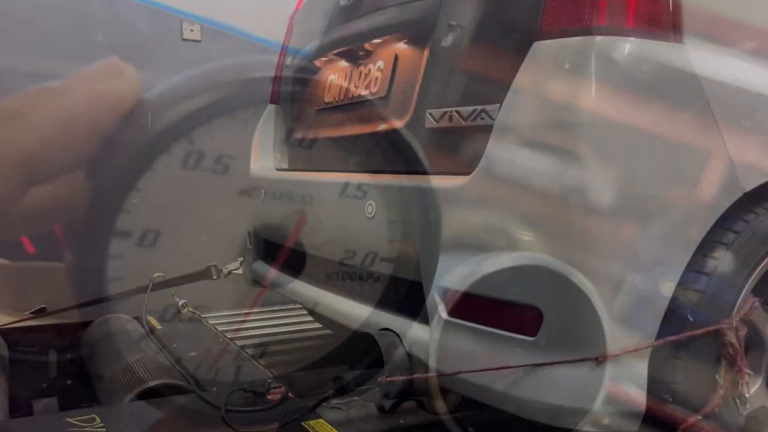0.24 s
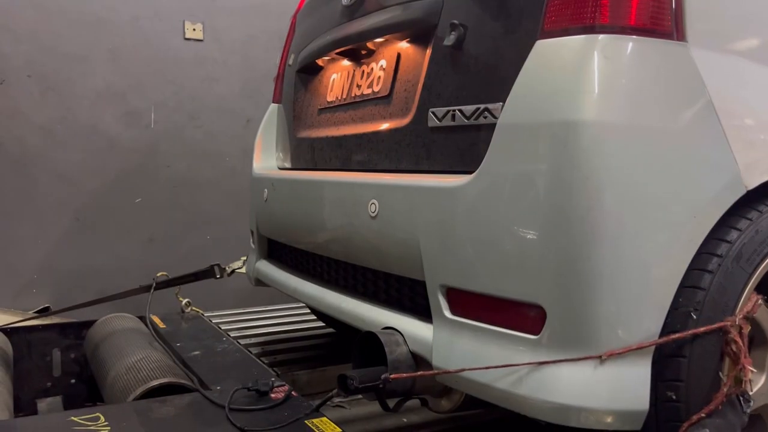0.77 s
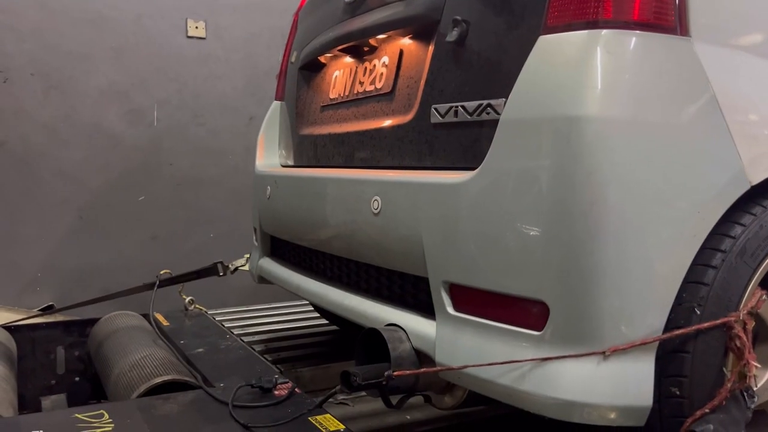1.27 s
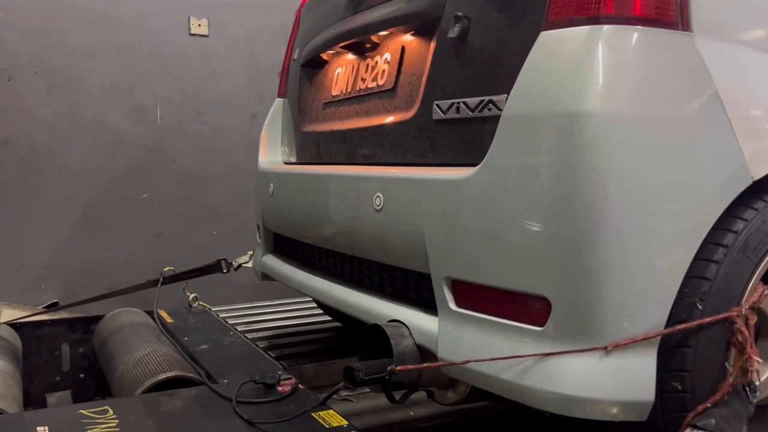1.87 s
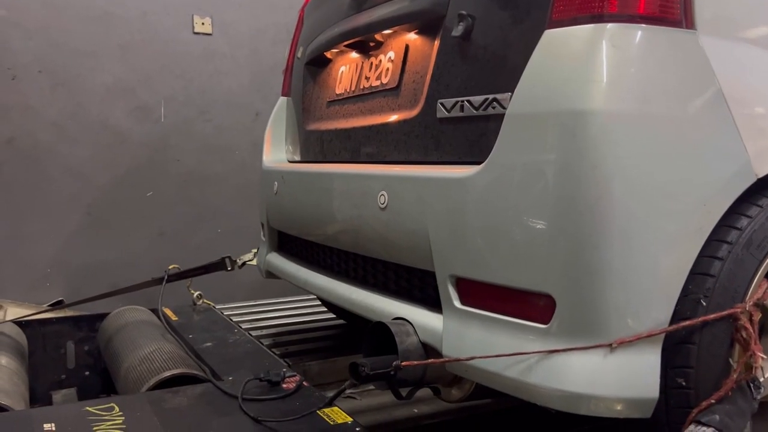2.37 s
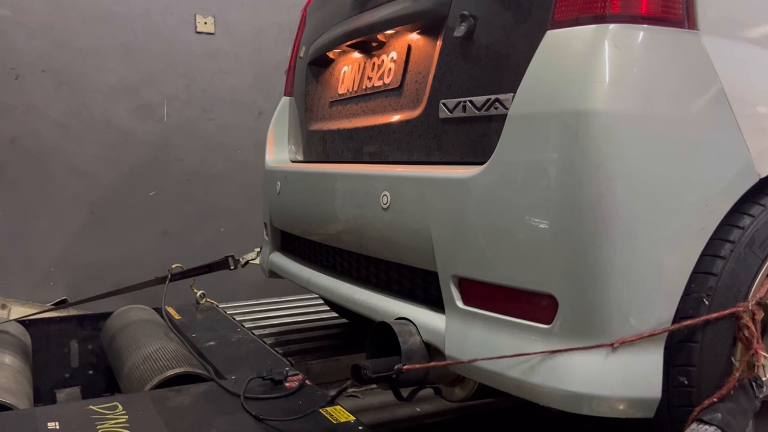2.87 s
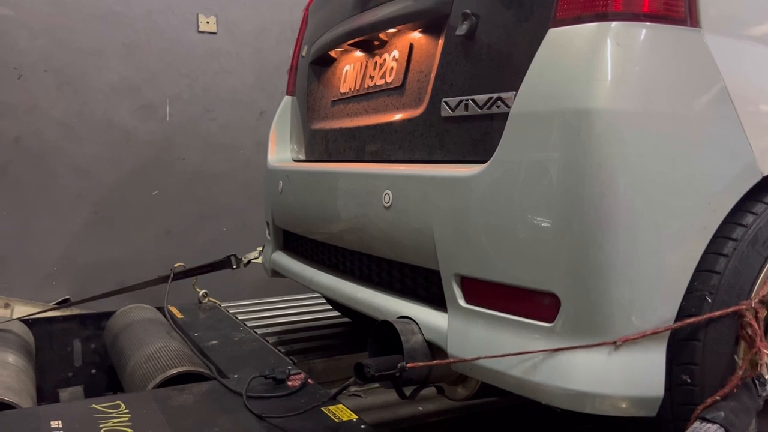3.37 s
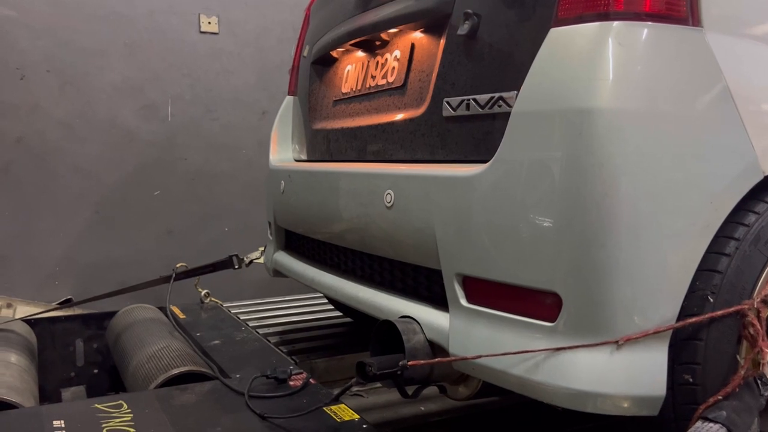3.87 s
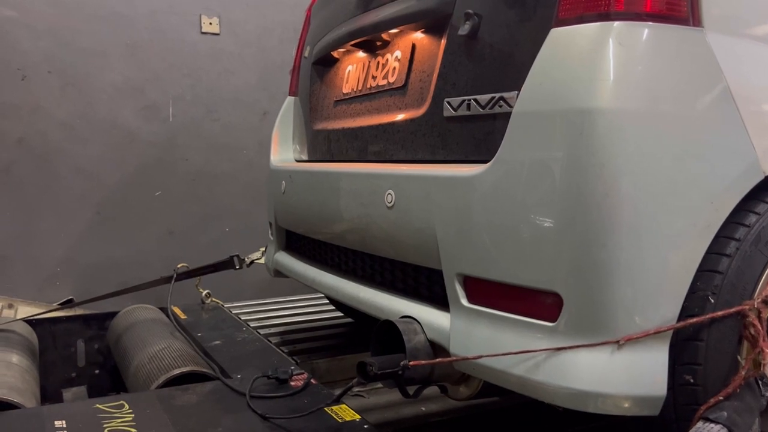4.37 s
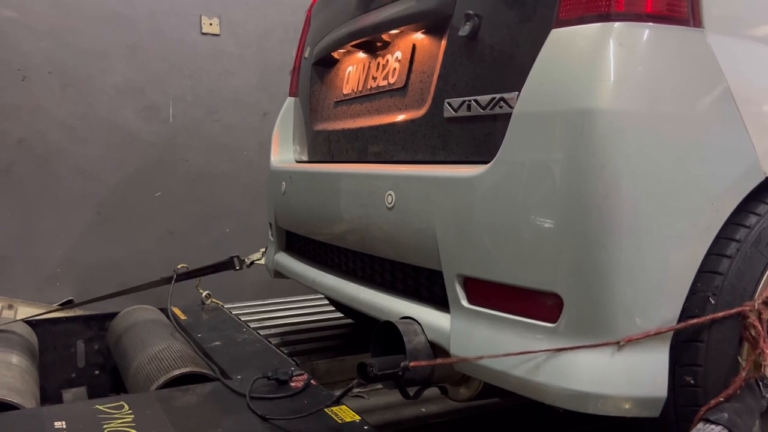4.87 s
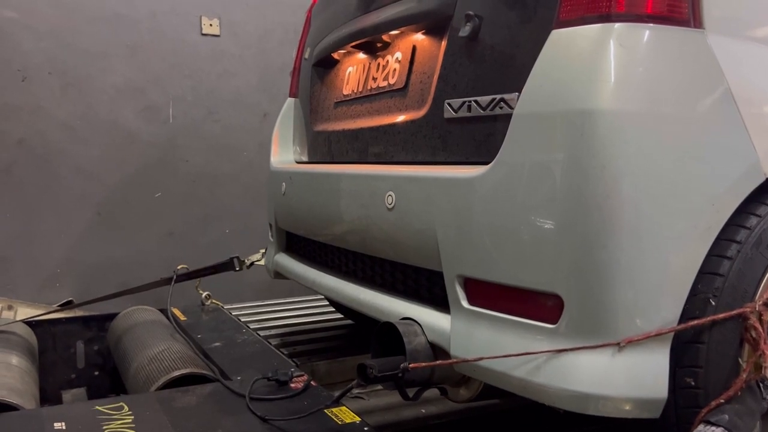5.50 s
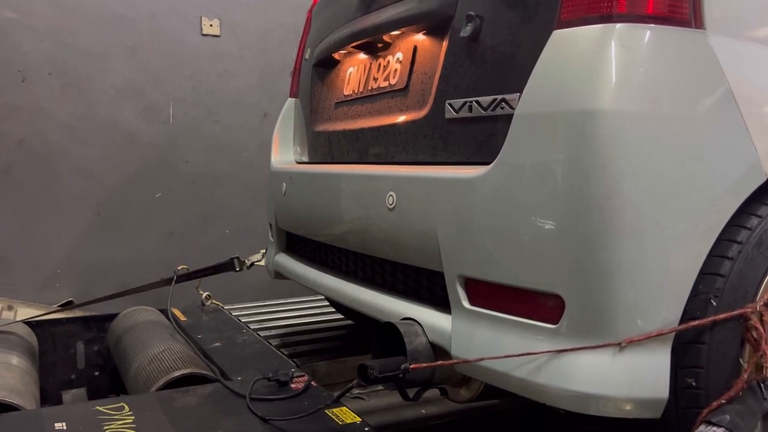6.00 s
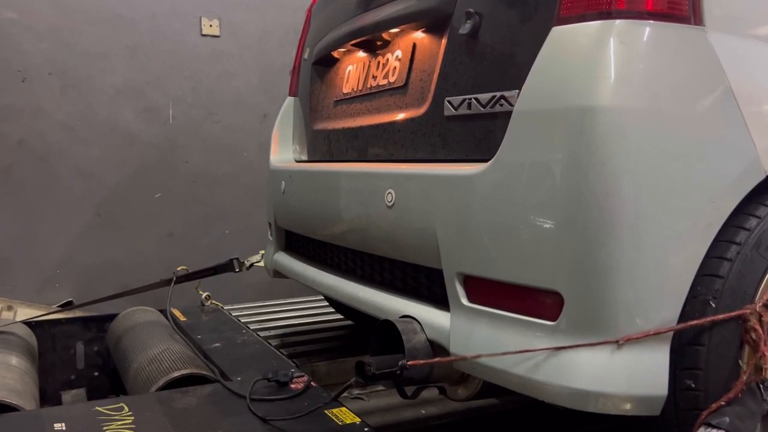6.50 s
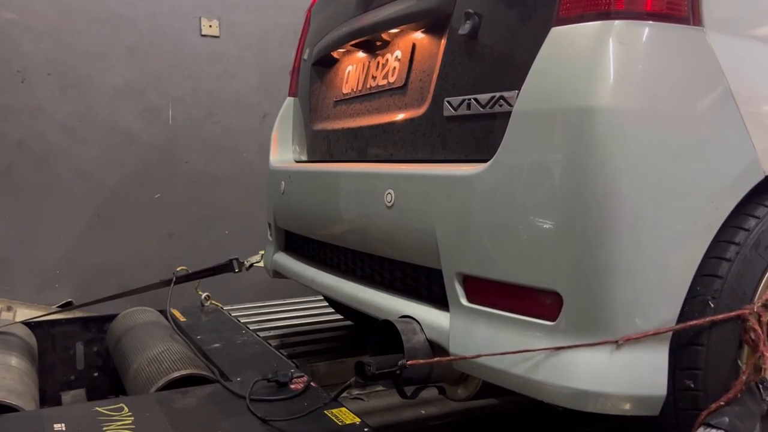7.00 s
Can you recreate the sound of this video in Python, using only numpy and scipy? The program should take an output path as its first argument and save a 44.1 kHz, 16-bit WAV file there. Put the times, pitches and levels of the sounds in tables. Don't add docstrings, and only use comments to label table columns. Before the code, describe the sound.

In a hard-walled workshop, a phone near the rear bumper picks up a small turbocharged engine on rollers. A previous squeal and exhaust note fade as a deep boomy pull begins, rising steadily with raspy bark, tyre roar, gear whine and growing boost hiss. Around six seconds the throttle shuts: the note stumbles, the pipe pops, and a bright blow-off squeal slides down, leaving a slightly falling overrun drone.

```python
import sys
import numpy as np
from scipy import signal
from scipy.fft import rfft, irfft
from scipy.io import wavfile
from scipy.ndimage import uniform_filter1d, minimum_filter1d

SR = 44100
rng = np.random.default_rng(int(sys.argv[2]) if len(sys.argv) > 2 else 0)


def put_to_file(sound):
    columns = np.atleast_2d(sound).T
    safe = np.clip(columns, -1, 1)
    whole_steps = np.round(safe * 32767)
    wavfile.write(sys.argv[1], SR, whole_steps.astype(np.int16))


def nominal_scale(level):
    x = np.asarray(level, float) / 20
    return 10 ** x


N = 319709
TIME = np.arange(N) / SR
HZ = np.maximum(np.arange(N // 2 + 1) * SR / N, 1)
THROTTLE_SHUT_S = 6.04

# (time [s], firing rate [Hz])
SPEED = [(0.0, 58.68), (0.65, 66.73), (1.35, 77.32), (2.01, 88.1), (2.28, 95.05), (2.56, 102.66),
         (2.76, 109.47), (2.96, 118.5), (3.3, 129.3), (3.7, 140.7), (4.1, 151), (4.6, 162.4), (5.1, 173.7),
         (5.6, 182.5), (6.0, 188.1), (6.09, 179.1), (6.3, 180.5), (7.25, 170.2)]
# (centre [Hz], width [Hz], level [dB])
NULLS = [(115, 1.3, -7), (127.4, 5.8, -3.5), (137.5, 6.4, -4.5), (162.5, 1.4, -19.5), (191.2, 11.9, -8.5),
         (226, 7.3, -10), (248.8, 3.0, -6.5), (269, 3.4, -7.5), (370.2, 2.7, -10.5), (408, 6.3, -24),
         (434.3, 19, -12.0), (459.5, 8.3, -14), (527, 3.4, -13), (547.8, 36, -20.5)]
SWELLS = [(66.3, 2.1, 3.1), (75.7, 2.8, 4.74), (89.2, 7.7, 8.6), (110, 3.9, 6), (144.7, 48.8, 14.2),
          (171.6, 2.5, 3.1), (187, 25.8, 10.55), (217.6, 28.1, 10.2), (255, 26.5, 8.6), (301.8, 13.6, 6.6),
          (317, 9.0, 5), (339.7, 38.7, 16.4), (480.9, 3.3, 4.1), (492.6, 15.4, 7.4)]


def curves(rows):
    s, *columns = np.transpose(rows)
    return [np.interp(TIME, s, c) for c in columns]


def along(table, hz):
    f, value = np.transpose(table)
    return np.interp(np.log(hz), np.log(f), value)


def bells(x, rows):
    return sum(db / (1 + (2 * (x - c) / max(w, 1e-3)) ** 2) for c, w, db in rows)


def unit(x):
    return x / np.sqrt(np.mean(np.abs(x) ** 2))


def walk(rate_hz):
    hold = max(int(SR / rate_hz), 1)
    steps = np.repeat(rng.standard_normal(N // hold + 1), hold)
    return unit(uniform_filter1d(uniform_filter1d(steps, hold), hold)[:N])


def rush(table):
    inside = (HZ > table[0][0]) & (HZ < table[-1][0])
    return unit(irfft(rfft(rng.standard_normal(N)) * nominal_scale(along(table, HZ)) * inside, N))


def turn(hz):
    return 2 * np.pi * np.cumsum(hz) / SR


def voice(rows, width_hz, clean, multiple=1):
    hz, db = curves(rows)
    clean = np.clip(clean, 0, 1)
    smear = walk(width_hz) + 1j * walk(width_hz)
    carrier = np.exp(1j * multiple * turn(hz))
    wave = (np.sqrt(2 * clean) + np.sqrt(1 - clean) * smear) * carrier
    sounding = uniform_filter1d(1. * ((TIME >= rows[0][0]) & (TIME <= rows[-1][0])), size=600)
    return wave.real * nominal_scale(db) * sounding


def geared(rows, ratio):
    return [(s, ratio * np.interp(s, *np.transpose(SPEED)), db) for s, db in rows]


def room_db(hz):
    # (centre [Hz], width [Hz], level [dB])
    modes = [(257, 53, 4.5), (305, 56, 5.5), (391, 7.5, 1), (443.6, 6.5, 5.5), (497, 60, -2), (588, 14, -6),
             (655.6, 36, 3), (736, 31, 1), (792, 15, 3), (834.5, 17, 6), (883, 23, 0.5), (916, 52, -7),
             (970, 30, -0.5), (1060, 42, -6), (1190, 49, -14), (1340, 87, -34)]
    grid_hz = np.arange(3000.)
    power = sum(nominal_scale(2 * db) / (1 + (2 * (grid_hz - f) / w) ** 2) for f, w, db in modes)
    return np.interp(hz, grid_hz, 10 * np.log10(power))


def standing_waves_db(hz):
    return bells(hz, NULLS + SWELLS)


def choke_db():
    catches_s = 6.215
    return -4 * uniform_filter1d(1. * ((TIME > THROTTLE_SHUT_S) & (TIME < catches_s)), size=900)


def exhaust_boom(phase, hz):
    # (time [s], level [dB], thinning [dB per order])
    load = [(0.0, -24.5, 6.5), (0.45, -20.5, 6.5), (0.7, -18, 5), (1.1, -22, 4.5), (1.6, -18.5, 5.5),
            (2.1, -22, 3.5), (2.5, -17.5, 5), (2.8, -24.5, 3.5), (3.0, -23.5, 4.5), (3.5, -30.5, -5.5),
            (4.0, -32, -5.5), (4.6, -31.5, 0.7), (5.1, -36, -3.5), (5.6, -37.5, -9), (6.0, -35.5, -4.5),
            (6.3, -34, -3.5), (6.7, -34.5, -2), (7.25, -33.5, -1)]
    # (time [s], width [s], level [dB])
    stumbles = [
        (6.043, 0.011, -19),
        (6.1, 0.058, 4),
        (6.192, 0.048, -8.5),
    ]
    orders_db = [1, -1.38, 1.04]
    coasting_db = [0, -6, 7]
    load_db, thin_db = curves(load)
    shared_db = load_db + bells(TIME, stumbles)
    tilt_db = choke_db() - thin_db
    boom = 0
    for k, order_db in enumerate(orders_db):
        db = shared_db + order_db + coasting_db[k] * (TIME > THROTTLE_SHUT_S) + k * tilt_db
        db = db + standing_waves_db((k + 1) * hz) + 0.29 * walk(40)
        boom = boom + nominal_scale(db) * np.cos((k + 1) * phase + k + 0.87 * walk(0.61))
    return boom


def exhaust_bark(phase, hz):
    # (time [s], level [dB], fall [dB per order])
    sharpness = [(0, -34.5, 1), (.6, -32.5, -0.5), (1, -30, 0), (1.2, -24.5, 0.1), (1.8, -23, 2),
                 (2.4, -21, 1.5), (2.85, -20, 0.7), (3, -24, 1.8), (3.55, -22, 0), (3.75, -24.5, 4.5),
                 (4.1, -31, .1), (4.5, -28.5, 3.5), (5.5, -33.5, 0.3), (6, -35.5, -3), (6.26, -36, 0),
                 (6.6, -34.5, 1.9), (7, -33.5, -1.5), (7.25, -26, 2.5)]
    # (order, level [dB])
    shape = [(4, -2), (5, -2.5), (6, -5), (7, -4.5), (8, -6.5), (9, -9), (10, -11.5), (11, -7), (12, -7),
             (13, -7.5), (14, -20), (15, -13)]
    bark_db, fall_db = curves(sharpness)
    upper_choke_db = 2.23 * choke_db()
    bark = 0
    for k, (_, shape_db) in enumerate(shape, 4):
        db = bark_db + upper_choke_db + shape_db - fall_db * (k - 4)
        db = db + room_db(k * hz) + 1.58 * walk(25.04)
        bark = bark + nominal_scale(db) * np.cos(k * phase + 0.4 * walk(1.536))
    return bark


def cylinder_lope(phase):
    # (time [s], depth [dB])
    depth = [(0, -12), (.7, -9), (1.3, -14), (2.0, -14), (2.4, -10), (2.8, -10), (3.4, -13), (3.8, -11),
             (4.7, -11), (7.25, -16)]
    once = np.cos(phase / 3 + 1.4 * walk(1.956))
    twice = 0.91 * np.cos(2 * phase / 3 + 0.84 * walk(2.04))
    return nominal_scale(curves(depth)[0]) * (once + twice)


def uneven_thirds(phase, hz):
    # (firing rate [Hz], strength [dB])
    uneven = [(105, -19), (126, -7.5), (150, -2), (166, -2), (176, -8), (188, -8)]
    lines_db = [-43.5, -48, -47.5, -46]
    strength_db = along(uneven, hz) - 12 * (TIME > THROTTLE_SHUT_S)
    lines = 0
    for k, line_db in zip(np.array([2, 4, 5, 7]) / 3, lines_db):
        db = line_db + strength_db + standing_waves_db(k * hz) + 3.2 * walk(7)
        lines = lines + nominal_scale(db) * np.cos(k * phase + 0.78 * walk(2.99))
    return lines


def exhaust():
    hz = curves(SPEED)[0]
    phase = turn(hz * (1 + 0.00086 * walk(30)))
    lope = cylinder_lope(phase)
    boom = exhaust_boom(phase, hz) * (1 + nominal_scale(-15.5) * lope)
    bark = exhaust_bark(phase, hz) * (1 + lope)
    return np.sqrt(2) * (boom + bark + uneven_thirds(phase, hz)), phase, hz


def opening_note_and_squeal():
    # (time [s], pitch [Hz], level [dB])
    opening_note = [(0.0, 155.7, -21), (0.1, 156, -17.5), (0.43, 151.7, -20.5), (0.47, 153, -30),
                    (0.62, 153, -28)]
    opening_squeal = [(0.0, 6550, -29), (0.036, 6440, -29.5), (0.184, 6270, -50), (0.3, 6200, -57)]
    squeal = voice(opening_squeal, 400, 0.16) + nominal_scale(1) * voice(opening_squeal, 1500, 0.0096)
    return squeal - voice(opening_note, 5.3, 0.57)


def rushing_air(phase, hz):
    # (time [s], gas flow [dB], boost [dB])
    flow = [(0, -37, -40.5), (.28, -36.5, -46), (.4, -34, -43.5), (.93, -31, -41.5), (1.33, -30, -42.5),
            (1.71, -29, -36), (2.23, -32.5, -32.5), (2.69, -30, -29), (2.91, -27, -26.5),
            (2.99, -30.5, -28), (4.7, -28, -29), (5.19, -30, -31), (6.1, -30, -32.5), (6.32, -31.5, -39.5),
            (6.52, -33, -43.5), (7.25, -34.5, -45.5)]
    # (frequency [Hz], density [dB per Hz])
    gas_colour = [(70, -13), (124, -9), (170, -0.5), (230, -5), (300, -2.5), (430, -2), (580, -5),
                  (720, -5), (900, -3), (1030, -13), (1400, -19.5), (2000, -44)]
    tyre_colour = [(530, -15), (900, -1), (1090, -2.5), (1350, -2), (1930, -3), (2080, -3), (2360, -3.5),
                   (4160, -10.5), (5950, -9.5), (8490, -18.5), (9000, -14.5), (11700, -56), (19800, -120)]
    boost_colour = [(1500, -35), (1900, 3.5), (2300, 1.5), (2800, -5.5), (4000, -5.5), (5700, -0.5),
                    (7500, -2), (9500, -4.5), (12000, -4), (14000, -23), (15000, -15), (15700, -32)]
    sizzle_colour = [(10000, -21), (12500, -1), (15700, 0)]
    flow_db, boost_db = curves(flow)
    gas_db = flow_db + np.interp(hz, [136, 158], [3, -3.5])
    gas = rush(gas_colour) * (1 + 0.73 * np.cos(phase)) * nominal_scale(gas_db + 0.57 * walk(4.9))
    tyres = rush(tyre_colour) * (1 + 0.064 * np.cos(phase)) * nominal_scale(flow_db + 3.0 + .5 * walk(12))
    boost = rush(boost_colour) * nominal_scale(boost_db + 4.5 + .5 * walk(21.87))
    sizzle = rush(sizzle_colour) * nominal_scale(1.35 * (boost_db + 30) - 36.0)
    return gas + tyres + boost + sizzle


def gears_and_rollers():
    # (time [s], level [dB])
    mesh = [(0, -42.5), (.38, -38.5), (.58, -34), (.68, -37), (.82, -32), (1.1, -36.5), (1.68, -40),
            (1.85, -50), (2.25, -42)]
    # (time [s], pitch [Hz], level [dB])
    roller = [(.4, 1260, -52), (.7, 1275, -44), (1.3, 1315, -43), (1.8, 1335, -44), (2.2, 1350, -52)]
    return voice(geared(mesh, 33.2), 120, 0.64) + voice(roller, 110, .15)


def turbine():
    # (time [s], pitch [Hz], level [dB])
    whistle = [(2.45, 13700, -46), (2.58, 14250, -38), (2.7, 14950, -38), (2.8, 15350, -35),
               (2.92, 15570, -33), (3.05, 15680, -37), (3.3, 15740, -41), (3.8, 15780, -56)]
    return voice(whistle, 600, 0.098)


def floor():
    # (frequency [Hz], density [dB per Hz])
    thud_colour = [(25, -35), (40, -19), (55, 5), (68, 14), (90, -3), (130, -32)]
    # (time [s], pitch [Hz], level [dB])
    drum = [(3.6, 49, -52), (3.9, 52.05, -39), (4.5, 58, -40), (4.9, 62.35, -37), (5.1, 60, -44),
            (5.5, 62, -35.5), (5.9, 63, -48), (6.6, 66, -50), (7.25, 65, -54)]
    fade_in = np.clip(TIME - 2.5, 0, 1)
    thud = rush(thud_colour) * nominal_scale(-52 + 1.8 * walk(5)) * fade_in
    return thud + voice(drum, 8, .65)


def pops():
    # (time [s], peak [dB], ring [Hz], t60 [s])
    charges = [
        (6.028, -18, 95, 0.063),
        (6.168, -16, 95, 0.093),
        (6.212, -15, 91, 0.14),
    ]
    out = np.zeros(N)
    for s, db, hz, t60_s in charges:
        t = np.maximum(TIME - s, 0)
        out += nominal_scale(db) * np.sin(2 * np.pi * hz * t) * 1000. ** (-t / t60_s)
    return out


def blow_off_valve():
    # (time [s], pitch [Hz], level [dB])
    squeal = [(6.08, 7120, -40), (6.106, 7070, -25), (6.24, 6770, -19.5), (6.35, 6510, -23),
              (6.44, 6360, -28.5), (6.56, 6170, -46)]
    edge = [(6.08, 7200, -50), (6.11, 7170, -31), (6.22, 7180, -39), (6.3, 7180, -52)]
    surge = [(6.08, 2560, -44), (6.12, 2735, -29), (6.16, 2965, -35), (6.2, 3016, -48)]
    overtone = [(6.2, 13500, -56), (6.28, 13200, -44), (6.38, 12900, -56)]
    body = voice(squeal, 520, .08, multiple=.99)
    echo = nominal_scale(-7.5) * voice(squeal, 800, .01, multiple=1.025)
    return body + echo + voice(edge, 80, .4) + voice(surge, 900, .05) + voice(overtone, 500, .1)


def coast_whine():
    # (time [s], level [dB])
    overrun = [(6.35, -58), (6.55, -48.5), (6.9, -52), (7.25, -53)]
    # (multiple, level [dB])
    harmonics = [(1, -5), (2, 0), (3, -2), (4, 3.5)]
    rows = geared(overrun, 11.72)
    return sum(nominal_scale(db) * voice(rows, 200, .3, multiple=k) for k, db in harmonics)


def echo_scatter():
    t = np.arange(SR // 2) / SR
    echoes = rng.standard_normal(SR // 2) * 1000. ** (-t / 0.38)
    echoes[:SR // 200] = 0
    scatter = rfft(echoes, N)
    return scatter / np.sqrt(uniform_filter1d(np.abs(scatter) ** 2, size=1500))


def scene():
    # (frequency [Hz], share alike in both ports [0-1])
    alike_rows = [(60, .99), (300, .975), (640, .82), (1200, .3), (2000, .15), (3500, .2), (6000, .15),
                  (7600, .4), (8300, .8), (9500, .999), (16000, .999)]
    # (frequency [Hz], left minus right [dB])
    lean_rows = [(60, 0.5), (110, 0.5), (200, 3), (380, 2), (700, 1.5), (1290, 1.0), (2380, -0.5),
                 (4400, 5), (8120, 2.5), (15000, -3)]
    # (frequency [Hz], left port lead [rad])
    lead_rows = [(60, 0.028), (350, 0.059), (900, 0.54), (2500, 0.93), (16000, 0.84)]
    lag_s, lag_from_hz = 1 / 3750, 7800
    note, phase, hz = exhaust()
    mix = note + opening_note_and_squeal() + rushing_air(phase, hz) + gears_and_rollers() + turbine()
    mix = mix + floor() + pops() + blow_off_valve() + coast_whine()
    sound = rfft(mix)
    alike = np.clip(along(alike_rows, HZ), 0, 1)
    near = np.sqrt((1 + alike) / 2)
    apart = np.sqrt((1 - alike) / 2) * echo_scatter()
    lag_rad = 2 * np.pi * np.maximum(HZ - lag_from_hz, 0) * lag_s
    shift = np.exp(1j * (along(lead_rows, HZ) - lag_rad))
    lean = nominal_scale(along(lean_rows, HZ) / 2)
    left = irfft(sound * (near + apart) * shift * lean, N)
    right = irfft(sound * (near - apart) / lean, N)
    return np.array([left, right])


def band_limit(x):
    return signal.sosfilt(signal.butter(12, 17110, fs=SR, output="sos"), x)


def record(dry):
    bass_cut = signal.butter(3, 48.3, "high", fs=SR, output="sos")
    heard = signal.sosfilt(bass_cut, dry)
    peak = np.maximum(np.abs(heard).max(axis=0), 1e-9)
    room_left = np.minimum(.92 / peak, 1)
    gain = uniform_filter1d(minimum_filter1d(room_left, size=801), size=401)
    top_cut = signal.ellip(10, .2, 70, 15740, fs=SR, output="sos")
    return band_limit(signal.sosfilt(top_cut, heard * gain))


dry = scene()
out = record(dry)
put_to_file(out)
```